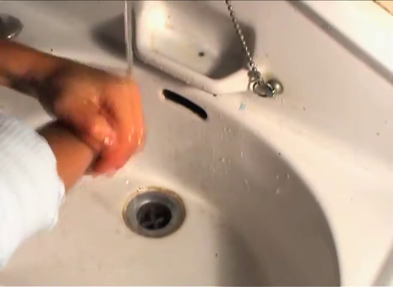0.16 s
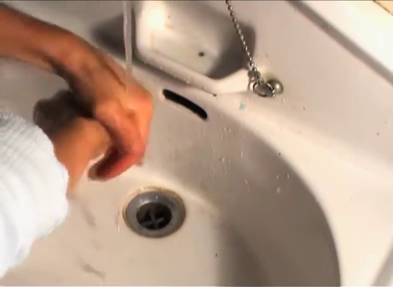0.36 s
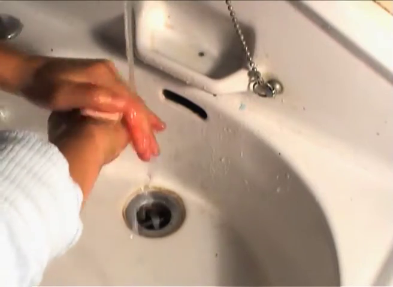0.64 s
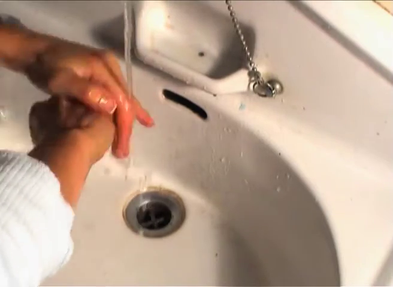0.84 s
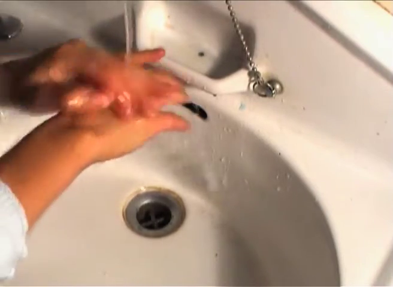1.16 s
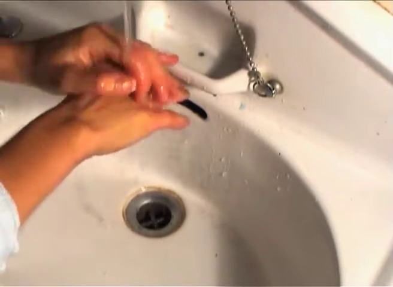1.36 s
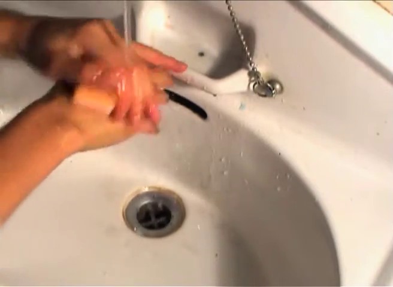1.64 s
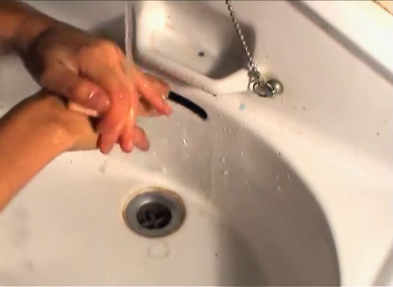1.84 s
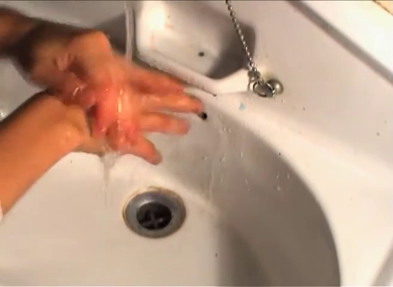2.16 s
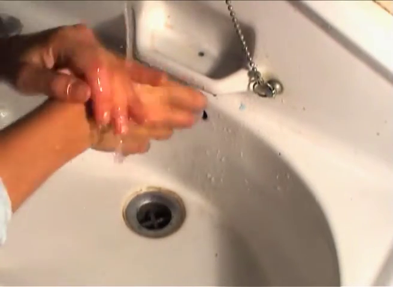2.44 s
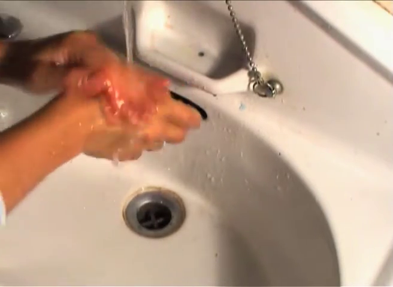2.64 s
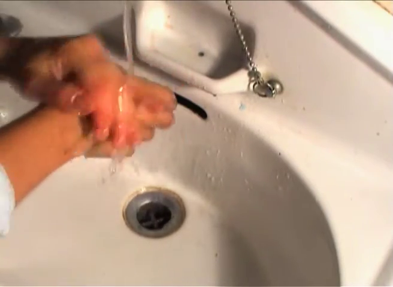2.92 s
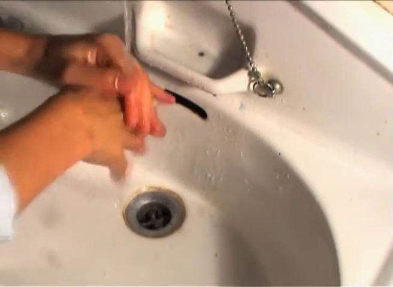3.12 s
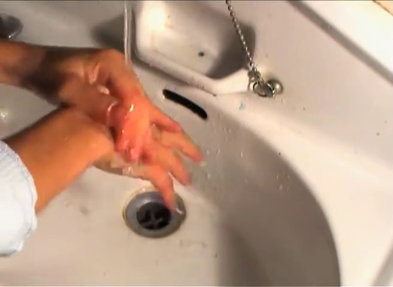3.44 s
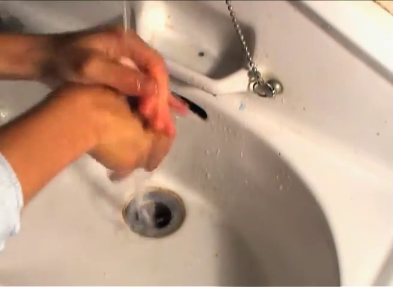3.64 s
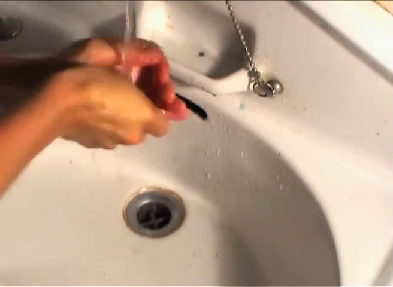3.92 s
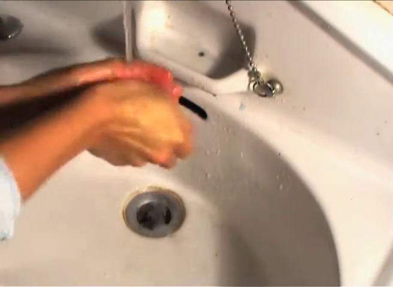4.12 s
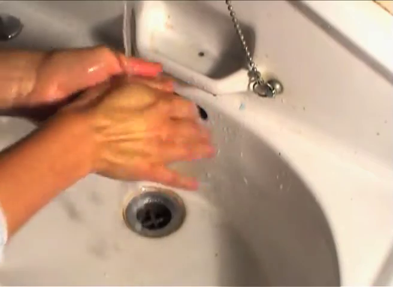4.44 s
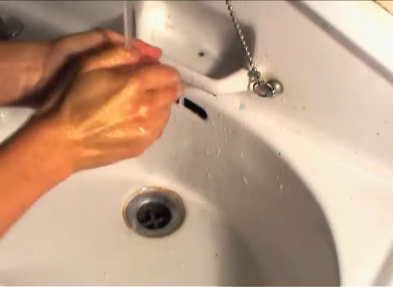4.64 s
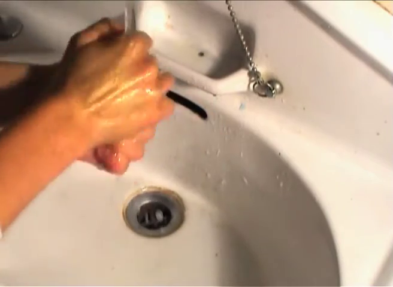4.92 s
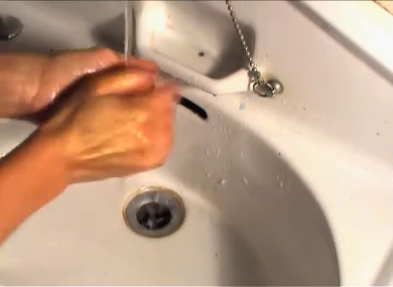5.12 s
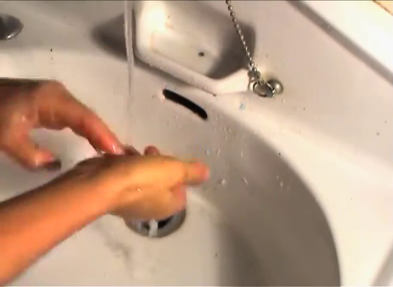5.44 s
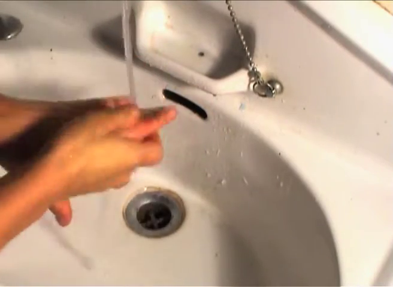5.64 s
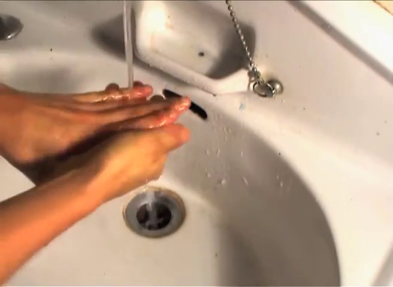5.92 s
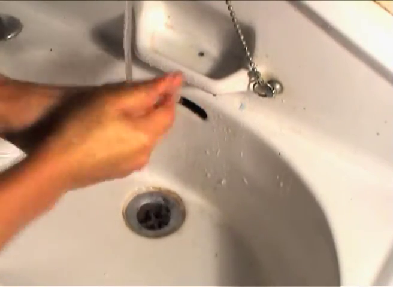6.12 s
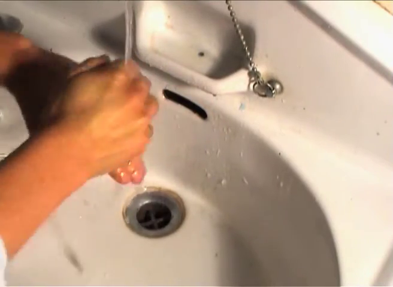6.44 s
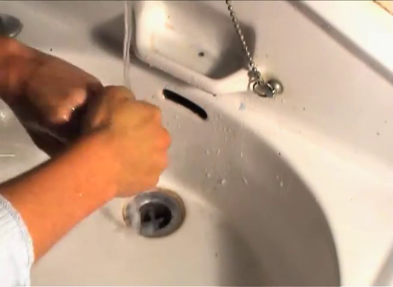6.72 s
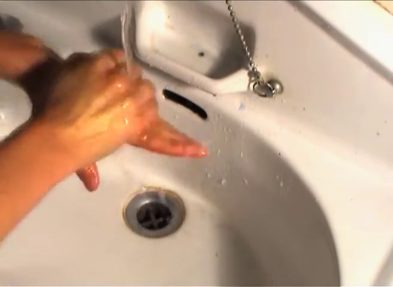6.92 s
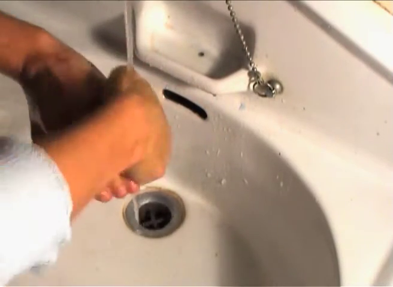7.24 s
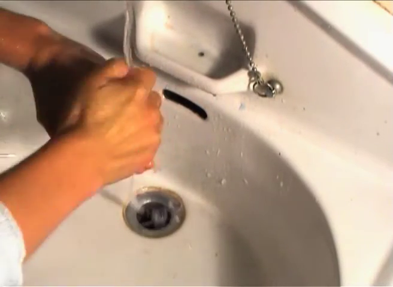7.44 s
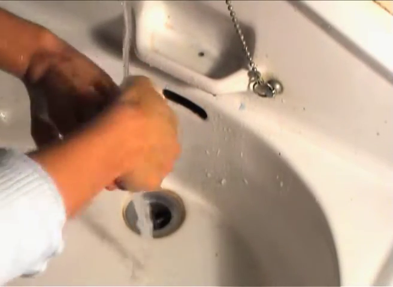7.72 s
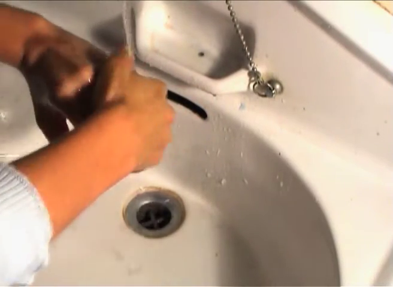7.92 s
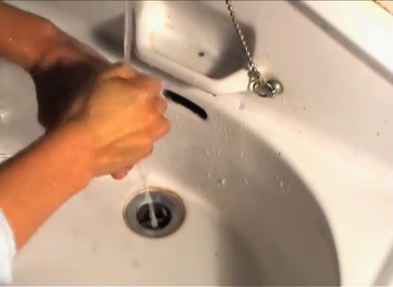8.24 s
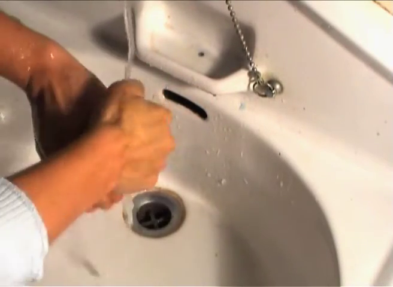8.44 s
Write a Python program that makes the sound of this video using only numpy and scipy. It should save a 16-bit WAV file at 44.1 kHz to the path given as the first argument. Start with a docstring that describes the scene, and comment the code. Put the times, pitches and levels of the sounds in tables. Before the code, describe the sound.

Tap water runs into a ceramic basin as wet hands rub, splashing and squelching over a gurgling drain.

```python
"""Rinsing hands under a tap

Hands rub under running water, over a ceramic basin in a small tiled room. The tap hisses and the flow
glugs in the low, hollow resonances of basin and waste pipe. Water spatters off the skin, wet palms
slosh and squelch with each stroke, and larger air pockets plop between the hands and in the drain."""
import sys
import numpy as np
from scipy import signal
from scipy.fft import rfft, irfft, next_fast_len
from scipy.io import wavfile
from scipy.ndimage import uniform_filter1d, map_coordinates

SR = 44100
rng = np.random.default_rng(int(sys.argv[2]) if len(sys.argv) > 2 else 0)


def pcm_store(signal):
    """Save signal as 16-bit PCM."""
    levels = np.round(np.clip(np.atleast_2d(signal), -1, 1) * 32767)
    wavfile.write(sys.argv[1], SR, levels.astype(np.int16).T)


N = 377937
TOP_HZ = 16100  # ceiling for bubble pitches and for the whole mix

# Water films bursting between the hands. Each row: start in seconds, relative level in dB, pitch in Hz.
FILM_BURSTS = [(0.0313, -18, 6880), (0.848, -15.5, 8520), (1.0663, -16, 3940), (1.1032, -13, 6900),
               (1.2455, -14.5, 8400), (1.716, -13.5, 7460), (1.928, -12.5, 8950), (2.1523, -18.5, 8700),
               (2.3416, -18, 7360), (2.7733, -21.5, 3510), (2.8785, -15, 5940), (2.9277, -15.5, 7100),
               (2.9773, -17, 4900), (3.359, -17.5, 7100), (3.42, -18.5, 8100), (3.5199, -24.5, 4430),
               (3.7087, -19, 7030), (3.8563, -15, 9000), (4.1242, -18.5, 5460), (4.483, -24.5, 4300),
               (4.5902, -13.5, 3700), (4.6638, -15.5, 4640), (4.7401, -17, 6440), (4.8374, -19.5, 5310),
               (4.9267, -12, 5580), (5.0572, -18.5, 4070), (5.1826, -21, 8700), (5.2892, -6.5, 8700),
               (5.7304, -13, 8420), (5.8255, -14.5, 10700), (6.2427, -18, 5370), (6.3053, -4.5, 5850),
               (6.4146, -8.5, 7070), (6.738, -20, 10600), (7.0748, -12.5, 9620), (7.961, -14.5, 4170),
               (7.9828, -10.5, 6930)]
# Water running off the hands. Each row: time in seconds, relative splash and spray levels in dB.
RUNOFF_LEVELS = [(0.0, -48.5, -45.5), (0.62, -45, -48.5), (0.93, -43.5, -42.5), (3.48, -46, -43),
                 (4.25, -40, -38), (4.56, -46, -44.5), (7.02, -42.5, -40.5), (7.37, -43, -39.5),
                 (7.83, -42.5, -47), (8.07, -38, -35.5), (8.26, -46.5, -43), (8.57, -34, -40.5)]


def amp(db):
    """Decibels to gain."""
    return 10 ** (np.asarray(db) / 20)


def unit(x):
    """Scale to rms 1."""
    return x / np.sqrt(np.mean(x ** 2) + 1e-20)


def add(track, s, sound):
    """Mix a sound into a track at s seconds."""
    start = max(round(s * SR), 0)
    part = track[start:start + len(sound)]
    part += sound[:len(part)]


def wobble(rate):
    """A smooth random curve with rate knots a second."""
    knots = rng.standard_normal(int(N * rate / SR) + 4)
    return map_coordinates(knots, [np.arange(N) * rate / SR])


def above(x, edge_hz):
    """Roll off the lows below the edge."""
    return signal.sosfilt(signal.butter(3, min(edge_hz, TOP_HZ), "highpass", fs=SR, output="sos"), x)


def filtered(x, response):
    """Filter x by a complex response of frequency."""
    size = next_fast_len(N + SR // 2)
    return irfft(rfft(x, size) * response(np.fft.rfftfreq(size, 1 / SR)), size)[:N]


def coloured(x, spectrum):
    """Equalise x through (Hz, dB) points on a log axis, at rms 1."""
    hz, db = np.transpose(spectrum)
    return unit(filtered(x, lambda f: amp(np.interp(np.log(f + 1), np.log(hz), db))))


def resonate(x, modes):
    """Ring x through (centre Hz, width Hz, dB) resonances, at rms 1."""
    def response(f):
        return sum(amp(db) * 1j * f * width / (hz * hz - f * f + 1j * f * width)
                   for hz, width, db in modes)
    return unit(filtered(x, response))


def bubbles(starts, hz, sizes, cycles, length):
    """Tiny bubbles ring for a few cycles each, rising slightly as they die away."""
    t = np.arange(SR // 250) / SR
    age = hz[:, None] * t / cycles
    glide = 1 + np.tanh(age / 2) / 10
    rings = sizes[:, None] * np.exp(-age) * np.sin(2 * np.pi * hz[:, None] * t * glide)
    where = (starts * SR).astype(int)[:, None] + np.arange(len(t))
    return np.bincount(where.ravel(), rings.ravel(), length)[:length]


def in_basin(x, bowl_db=-4, bowl_t60=0.048, room_db=-1.0, room_t60=0.2):
    """Direct sound, quick bowl reflections and the tiled room's tail, new for each hand position."""
    t = np.arange(SR // 5) / SR
    decays = amp([-60 * t / bowl_t60, -60 * t / room_t60])
    bowl, room = rng.standard_normal((2, len(t))) * (t > .002) * decays
    response = amp(bowl_db) * bowl / np.linalg.norm(bowl) + amp(room_db) * room / np.linalg.norm(room)
    response[0] = 1
    return signal.fftconvolve(x, response / np.linalg.norm(response))


def tap(hiss_db=-47, valve_db=-51.0, hum_db=-73, hum_hz=119, whistle_hz=3422):
    """The tap's steady rush, with narrow resonances and a thin wavering whistle, over a faint hum."""
    # Tone of the rushing water. Each row: frequency in Hz, relative level in dB.
    hiss_eq = [(20, -3), (50, -5.5), (85, -1), (180, -0.5), (500, 7), (1300, -2.5), (3300, 0.5), (5500, -2),
               (8400, 2), (10000, -6.5), (12000, -1), (16000, -14)]
    # Narrow resonances in the hiss. Each row: centre in Hz, width in Hz, relative level in dB.
    valve_modes = [(2690, 20, -1), (3185, 22, -2), (3470, 90, -2), (4170, 25, -1), (4900, 18, 0),
                   (8500, 150, -9)]
    t = np.arange(N) / SR
    hiss = amp(hiss_db) * coloured(rng.standard_normal(N), hiss_eq)
    valve = amp(valve_db) * resonate(rng.standard_normal(N), valve_modes)
    whistle_gain = amp(-57.5 + 2.5 * wobble(12))
    whistle = whistle_gain * np.sin(2 * np.pi * np.cumsum(whistle_hz + 7 * wobble(25)) / SR)
    return hiss + valve + whistle + amp(hum_db) * np.sin(2 * np.pi * hum_hz * t)


def gurgle(level_db=-49, flow_db=-54, rate=19, unevenness=.35, swell_s=0.0089, stray=0.32):
    """Uneven gulps of the flow, some of them heavy glugs, swell and fade in the hollow resonances."""
    # Resonances of basin and waste pipe. Each row: centre in Hz, width in Hz, relative level in dB.
    hollow_modes = [(255.8, 32, -2), (327, 30, -1), (510, 35, 0), (610, 13, 2.5), (666, 15, -1),
                    (772.7, 70, -2), (946.3, 12, -2.5)]
    # Heavy glugs in the waste pipe. Each row: start in seconds, relative level in dB.
    heavy_glugs = [(1.293, -33.5), (2.862, -31.5), (3.588, -34), (6.753, -31.5), (6.886, -40), (7.207, -32),
                   (8.135, -29), (8.158, -27), (8.427, -36)]
    gulps, t = np.zeros(N), np.arange(SR // 12) / SR
    hz, width, mode_db = np.transpose(hollow_modes)[:, :, None]
    swell = t / swell_s * np.exp(-t / swell_s)
    pause, size = rng.standard_normal((int(rate * (N / SR + 1)), 2)).T
    times = np.cumsum(np.exp(unevenness * pause)) / rate
    light_gulps = zip(times, -38 + 2.5 * size)
    for s, db in [*light_gulps, *heavy_glugs]:
        # the moving water retunes and reweights the resonances for each gulp
        detune, weight, phase = rng.standard_normal((3, len(hz), 1))
        pitch = hz + stray * width * detune
        tones = amp(mode_db + 4.5 * weight) * np.sin(2 * np.pi * (pitch * t + phase))
        add(gulps, s, amp(db) * unit(swell * tones.sum(axis=0)))
    flow = unit(above(resonate(rng.standard_normal(N), hollow_modes), hollow_modes[0][0]))
    return amp(level_db) * unit(gulps) + amp(flow_db) * flow


def droplets(rate, pitch_hz, octaves, cycles, scatter_db):
    """Drops fall at random, many small and a few large; their reflections shift as the hands move."""
    when, spread, weight = rng.random((int(rate * N / SR), 3)).T
    hz = np.minimum(pitch_hz * 2 ** (octaves * (2 * spread - 1)), TOP_HZ)
    sizes = amp(scatter_db * np.minimum(-np.log(1 - weight), 4))
    drops = bubbles(when * N / SR, hz, sizes, cycles, N)
    out, step = np.zeros(N), SR // 8
    for start in range(0, N, step):
        add(out, start / SR, in_basin(drops[start:start + step]))
    return out


def rubbing(slip_s=0.03, lag_s=0.026):
    """How hard the hands slide over each other, at rms 1: they slip on just after every squelch."""
    t = np.arange(0, N, SR // 200) / SR
    s, db = np.transpose(FILM_BURSTS)[:2, :, None]
    effort = np.sum(amp(db) * np.exp(-((t - s - lag_s) / slip_s) ** 2 / 2), axis=0)
    return unit(np.sqrt(np.interp(np.arange(N) / SR, t, effort)))


def runoff(splash_db=-2.5, spray_db=-0.5, swish_db=-49, flutter_db=2, flicker_db=2.6):
    """Large drops splash on the ceramic; fine spray crackles on the skin and swishes as hands slide."""
    # Tone of the drops on ceramic. Each row: frequency in Hz, relative gain in dB.
    splash_eq = [(500, -16.5), (1100, -14.5), (2000, -5.5), (3400, 3.5), (5000, 0), (9000, -1)]
    # Tone of the spray on skin. Each row: frequency in Hz, relative gain in dB.
    spray_eq = [(1200, -45), (3000, -6.5), (4500, -1.5), (8000, 4.5), (11000, 2.5), (16000, -7)]
    s, *levels = np.transpose(RUNOFF_LEVELS)
    splash_level, spray_level = (np.interp(np.arange(N) / SR, s, level) for level in levels)
    splash = droplets(rate=600, pitch_hz=2327, octaves=1.21, cycles=2.9, scatter_db=3.5)
    spray = droplets(rate=600, pitch_hz=7420, octaves=1.33, cycles=1.57, scatter_db=5.9)
    splash = amp(splash_level + splash_db) * coloured(splash, splash_eq)
    spray_gain = np.hypot(amp(spray_level + spray_db), amp(swish_db) * rubbing())
    spray = spray_gain * amp(flicker_db * wobble(110)) * coloured(spray, spray_eq)
    return amp(flutter_db * wobble(22)) * (splash + spray)


def squelches(trim_db=-11, pace_s=.0015, octaves=0.308, climb=0.63, scatter=0.65, fizz_db=-14, count=20):
    """A film of water bursts into a quick run of bubbles whose pitch climbs as the gap closes."""
    out, length = np.zeros(N), SR // 10
    order = np.arange(count) / count
    starts = pace_s * (order + 2 * order ** 2)  # the run slows down
    fizz_decay = np.exp(-np.arange(length) / SR / (pace_s + 0.001))
    for s, db, hz in FILM_BURSTS:
        contour = climb * unit(order - order.mean()) + scatter * rng.standard_normal(count)
        pitch = np.minimum(hz * 2 ** (octaves * contour), TOP_HZ)
        # smaller bubbles ring more briefly but more sharply
        sizes = np.sqrt(pitch / hz) * np.exp(-0.54 * order) * rng.choice([-1, 1], count)
        burst = unit(bubbles(starts, pitch, sizes, cycles=5.4, length=length))
        fizz = unit(above(rng.standard_normal(length) * fizz_decay, edge_hz=3000))
        # such small bubbles radiate no bass, and the hands shade their very top
        squelch = signal.lfilter([.5, .5], 1, above(burst + amp(fizz_db) * fizz, 0.37 * hz))
        add(out, s, amp(db + trim_db) * in_basin(squelch) / np.sqrt(8))
    return out


def showers(rate=11, over_spray_db=18.0, scatter_db=3.5, flung_db=-9, flight_s=.006):
    """Cues (seconds, dB) for showers of tiny drops: each squelch flings one, others fall at random."""
    s, _, spray_level = np.transpose(RUNOFF_LEVELS)
    jitter, weight = rng.random((int(rate * N / SR), 2)).T
    times = (np.arange(len(jitter)) + jitter) / rate
    levels = np.interp(times, s, spray_level) + over_spray_db + scatter_db * unit(weight - weight.mean())
    flung = [(start + flight_s, db + flung_db) for start, db, _ in FILM_BURSTS]
    return flung + list(zip(times, levels))


def spatters(delay_s=0.0055, fade_s=0.0055, pitch_hz=9500, octaves=0.26, count=14):
    """Each shower lands as a few needle-sharp ticks, the fastest drops first."""
    out = np.zeros(N)
    for s, db in showers():
        landing = delay_s * np.r_[0, rng.exponential(size=count - 1)]
        pitch = np.minimum(pitch_hz * 2 ** (octaves * rng.standard_normal(count)), TOP_HZ)
        sizes = np.exp(-landing / fade_s) * rng.exponential(size=count)
        ticks = above(bubbles(landing, pitch, sizes, cycles=3.0, length=SR // 10), edge_hz=3500)
        add(out, s, amp(db) * in_basin(ticks / np.abs(ticks).max()))
    return out


def air_pockets(trim_db=2, ring_s=0.01224, ref_hz=1010, waver_octaves=0.13, slosh_db=-11):
    """A trapped air pocket rings briefly, gliding up as it shrinks, while water sloshes in round it."""
    # Plops in cupped hands and in the drain.
    # Each row: start in seconds, relative level in dB, starting pitch in Hz, rise in octaves.
    plops = [(0.205, -38, 1490, .6), (1.231, -41.5, 1790, .1), (1.389, -43, 1710, .2),
             (1.869, -37, 2670, .08), (2.431, -35, 1875, 0.93), (2.564, -32, 2395, 0.22),
             (2.773, -34, 3000, .2), (4.037, -38, 1105, 0.76), (4.074, -25.5, 1693, .16),
             (5.406, -37.5, 457, .03), (5.451, -33, 457, .03), (5.543, -29, 477, 0.12),
             (5.55, -40, 1360, .1), (5.579, -23.5, 455, .35), (5.958, -29.5, 2640, 0.67),
             (6.681, -36, 1940, 0.52), (7.001, -32, 1780, 0.54), (7.087, -31, 572, 0.15),
             (7.093, -38, 1284, 0.072), (7.447, -18, 2083, 1.17), (7.866, -35, 1413, 0.078),
             (7.875, -28, 2400, 0.075), (8.172, -30.5, 1955, 0.39), (8.47, -30, 2310, 0.56)]
    out, t = np.zeros(N), np.arange(SR // 12) / SR
    freqs = np.fft.rfftfreq(len(t), 1 / SR) + 1
    for s, db, hz, rise in plops:
        age = t / (ring_s * (ref_hz / hz) ** .65)  # larger, lower pockets ring longer
        waver = unit(uniform_filter1d(rng.standard_normal(len(t)), max(int(SR / hz), 1)))
        pitch = hz * 2 ** (rise * np.minimum(age, 1) + waver_octaves * waver)
        ring = unit(np.sin(2 * np.pi * np.cumsum(pitch) / SR))
        band = np.exp(-np.log2(freqs / (1.28 * hz)) ** 2 / 2)  # about an octave either side
        slosh = unit(irfft(band * rfft(rng.standard_normal(len(t))), len(t)))
        envelope = (1 - np.exp(-6 * age)) * np.exp(-age ** 2)
        plop = above(envelope * (ring + amp(slosh_db) * slosh), 0.52 * hz)
        add(out, s, amp(db + trim_db) * in_basin(unit(plop)) / np.pi)
    return out


def strokes(trim_db=3.5, rate=2500, octaves=0.544, scatter_db=9.5):
    """A stroke presses out a dense slosh of bubbles that swells and drains away."""
    # One wet hand passing over the other.
    # Each row: start in seconds, relative level in dB, pitch in Hz, swell time in seconds.
    palm_strokes = [(0.775, -36.5, 6760, 0.023), (1.014, -31, 5140, 0.0098), (1.475, -30, 5800, 0.011),
                    (1.688, -35, 7100, .005), (1.94, -31, 5660, 0.012), (2.389, -35, 5870, 0.013),
                    (2.464, -29.5, 8100, 0.0077), (2.552, -34.5, 3650, 0.014), (2.89, -30.5, 6160, 0.011),
                    (4.01, -31, 5570, 0.021), (4.205, -36, 4440, 0.0099), (4.96, -29.5, 6900, 0.014),
                    (5.672, -33, 9500, 0.0071), (5.915, -30.5, 5200, 0.0065), (6.204, -35.5, 6370, 0.059),
                    (6.31, -24, 8900, 0.0086), (6.413, -29.5, 4170, 0.0047), (7.294, -36, 5800, 0.018),
                    (7.38, -31.5, 5700, 0.019), (7.982, -30.5, 5740, 0.015), (8.05, -37, 5400, 0.037)]
    out, length = np.zeros(N), SR // 5
    slots = np.linspace(0, length / SR, int(rate * length / SR))
    for s, db, hz, swell_s in palm_strokes:
        jitter, spread, weight = rng.standard_normal((len(slots), 3)).T
        starts = abs(slots + jitter / rate)
        pitch = np.minimum(hz * 2 ** (octaves * spread), TOP_HZ)
        froth = bubbles(starts, pitch, amp(scatter_db * weight), cycles=2.0, length=length)
        slosh = unit(above(froth, 0.52 * hz))
        age = np.arange(length) / SR / swell_s
        add(out, s, amp(db + trim_db) * in_basin(slosh * age * np.exp(1 - age)))
    return out


def scene():
    """All the water in mono, heard from just above the basin."""
    return (tap() + gurgle() + runoff() + strokes() + squelches() + air_pockets() + spatters())[None]


def record(dry):
    """A steep low-pass takes off the very top of the treble."""
    return filtered(dry[0], lambda hz: 1 / (1 + (hz / TOP_HZ) ** 160))[None]


dry = scene()
out = record(dry)
pcm_store(out)
```